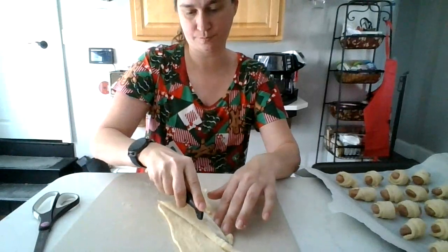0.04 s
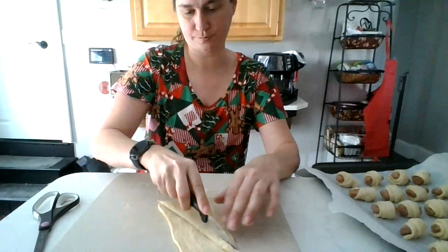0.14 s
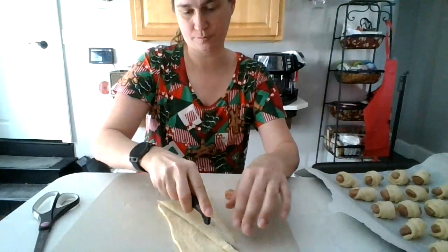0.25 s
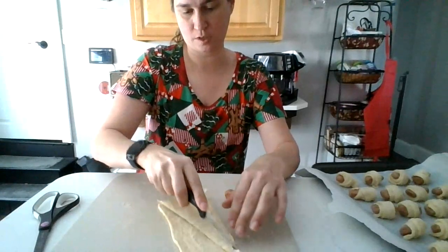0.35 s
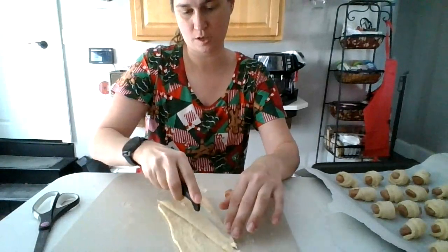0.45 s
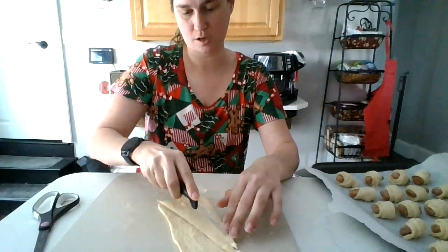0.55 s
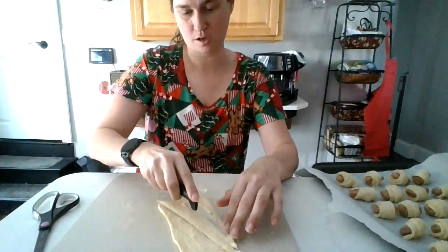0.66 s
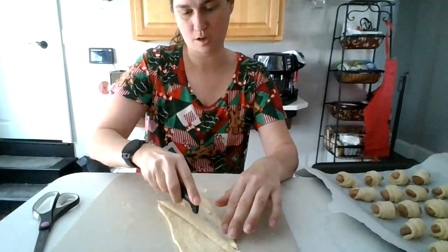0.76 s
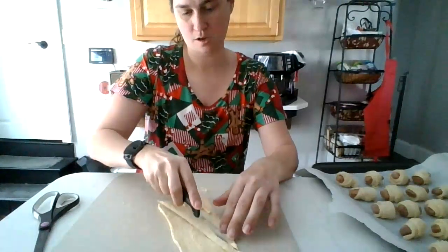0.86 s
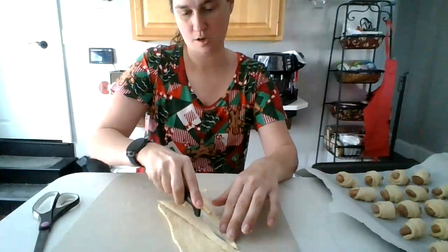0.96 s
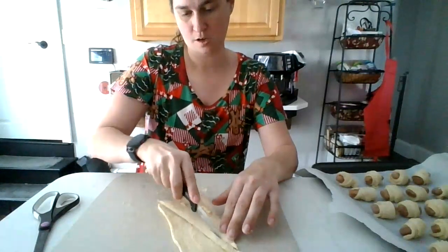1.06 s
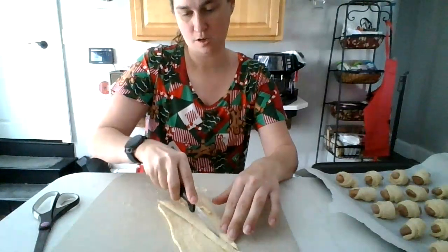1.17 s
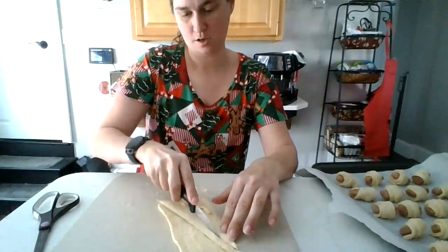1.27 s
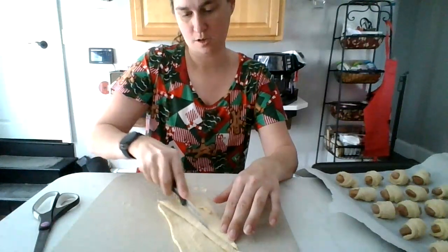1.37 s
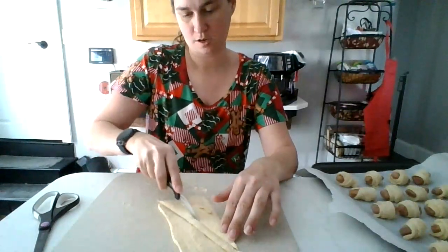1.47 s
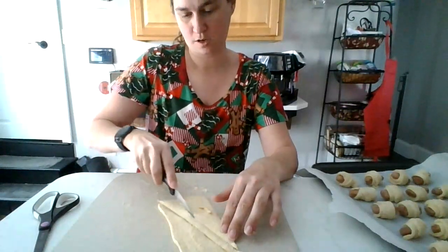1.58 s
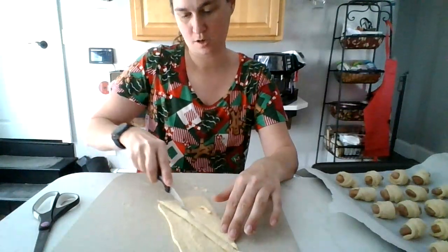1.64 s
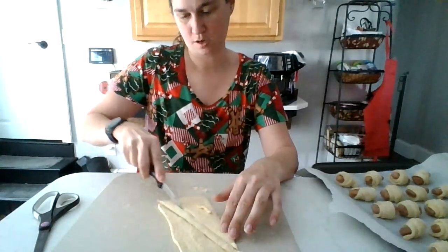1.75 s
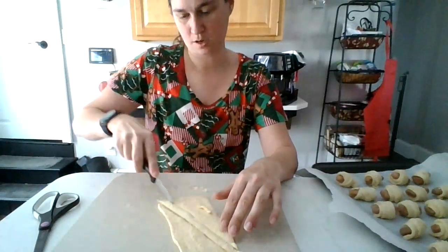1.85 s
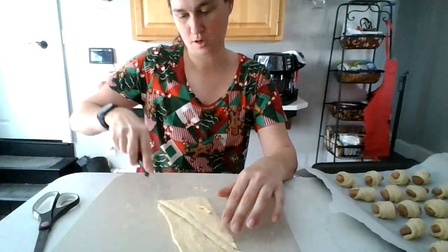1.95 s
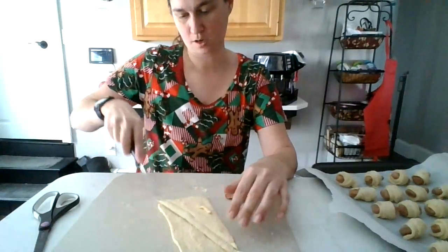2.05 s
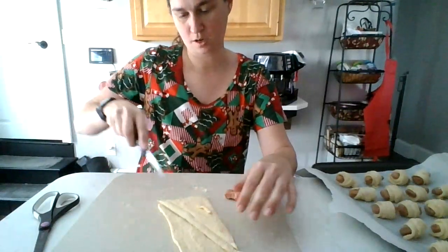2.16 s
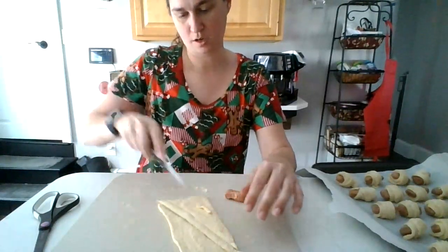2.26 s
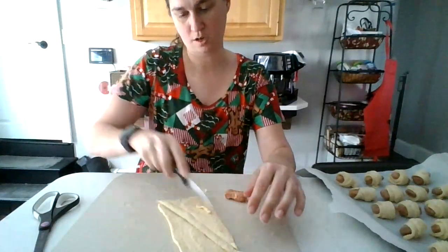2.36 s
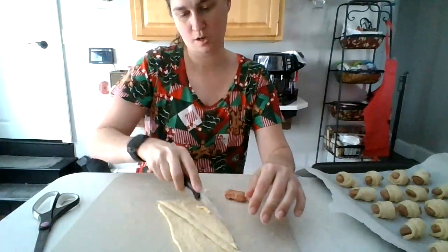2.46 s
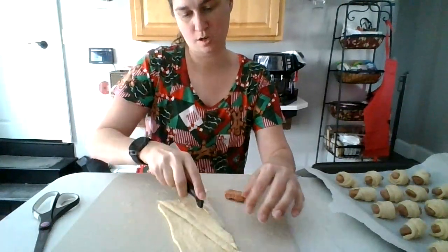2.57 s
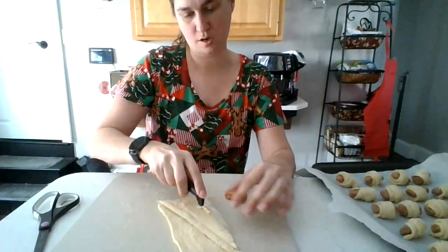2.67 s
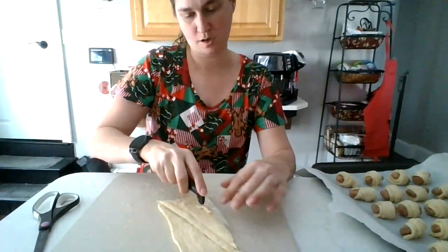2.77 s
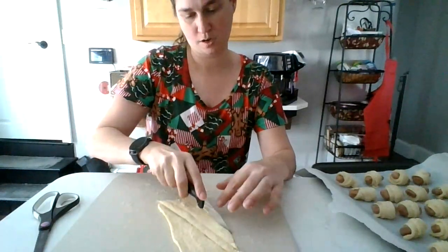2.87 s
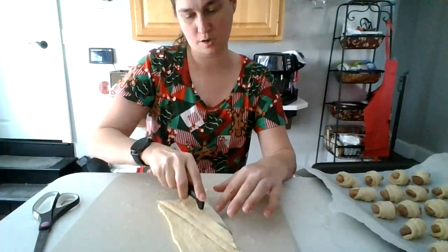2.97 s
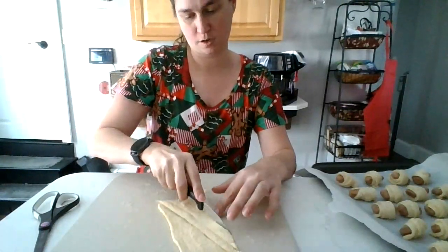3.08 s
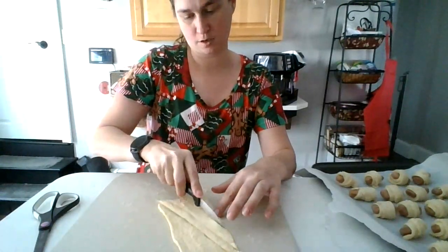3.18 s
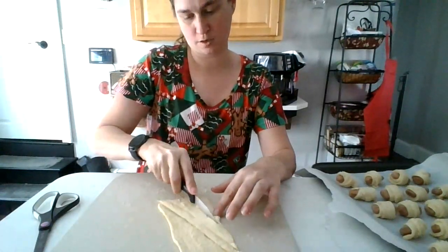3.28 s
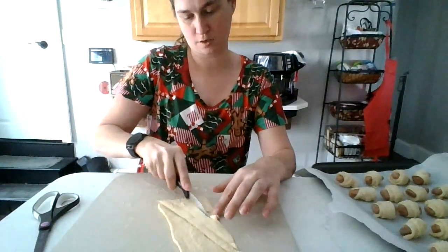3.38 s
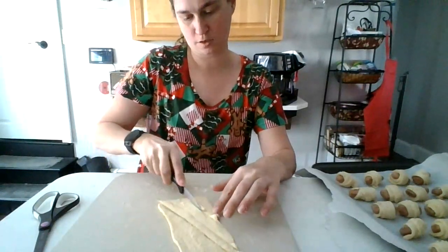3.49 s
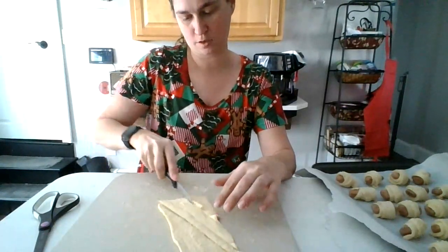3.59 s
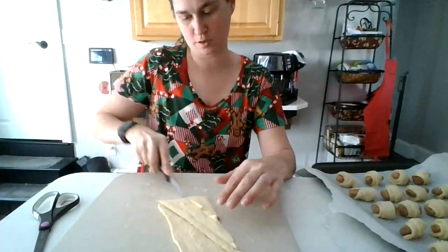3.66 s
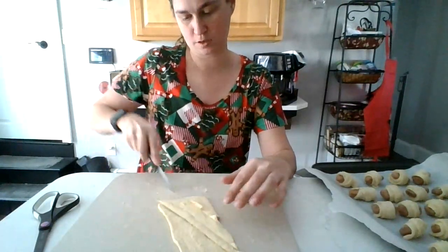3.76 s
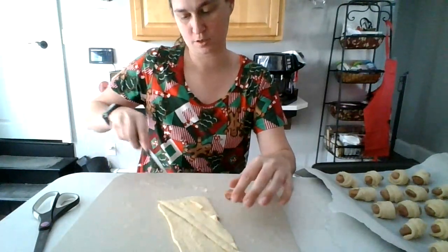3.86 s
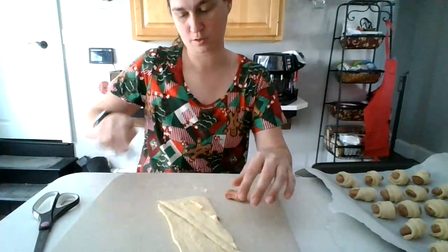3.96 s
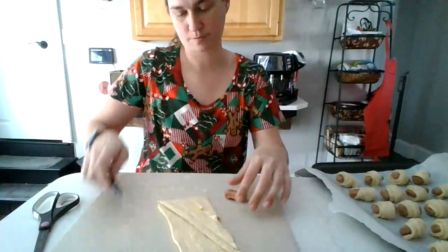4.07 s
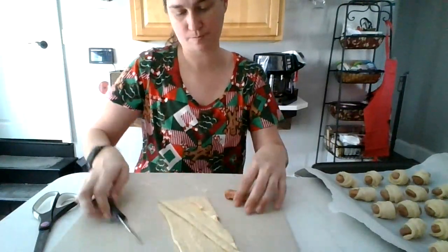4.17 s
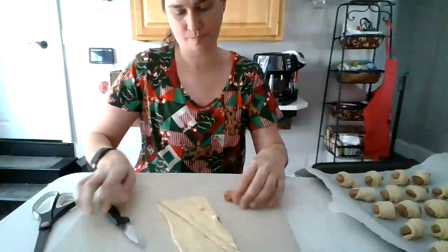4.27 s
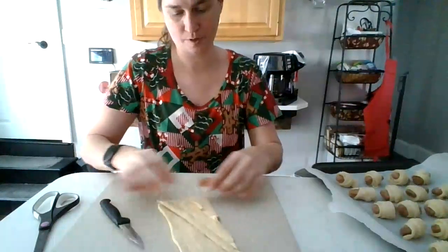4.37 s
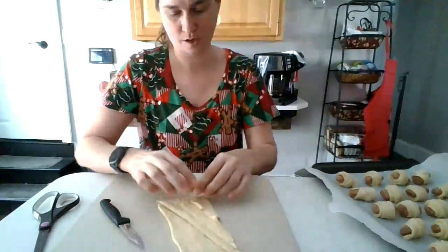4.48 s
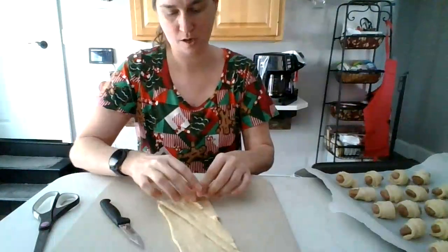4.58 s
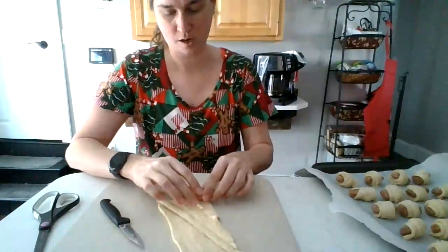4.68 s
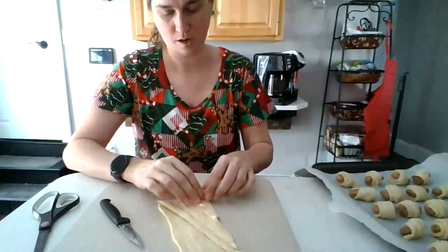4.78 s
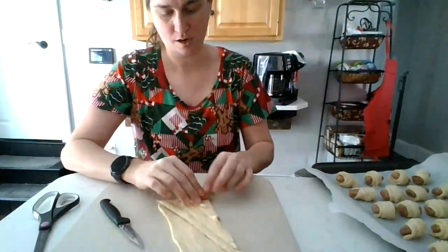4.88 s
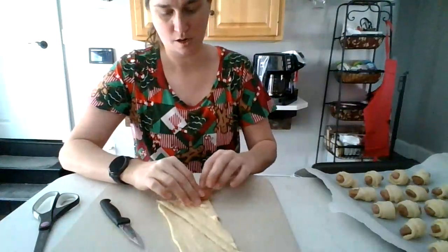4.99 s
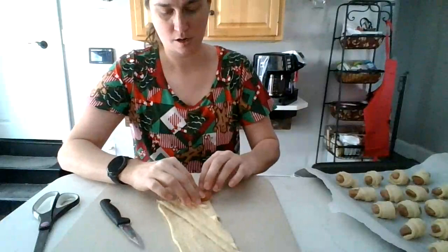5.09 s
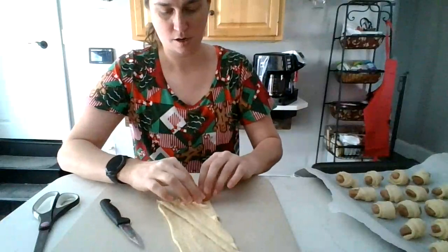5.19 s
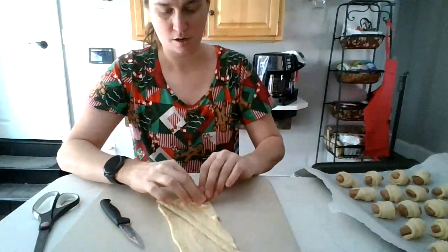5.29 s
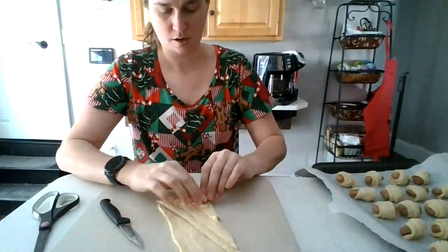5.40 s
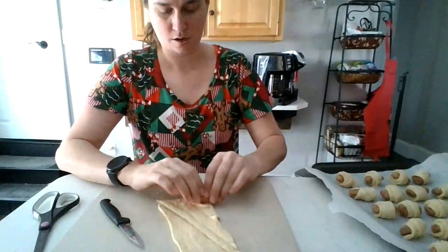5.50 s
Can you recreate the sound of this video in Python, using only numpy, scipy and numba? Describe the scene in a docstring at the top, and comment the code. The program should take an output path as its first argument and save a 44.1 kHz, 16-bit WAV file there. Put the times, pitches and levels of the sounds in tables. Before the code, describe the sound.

A faint, low motor hum and soft hiss run throughout in a small, hard-walled kitchen, heard in close stereo. For the first second, fingers lightly brush sticky dough, making tiny ticks. At 1.3 seconds a knife is drawn through the dough with a quiet, uneven hiss, ending near 2.1 seconds in a short rasp on the plastic board. A couple of ticks and a soft brush come around 2.8 seconds. A second cut starts at 3.1 seconds, swelling to another rasp at about 3.8. At 4.2 seconds the knife is dropped on the board: a quick, bright clatter with two sharp main hits, a brief metallic ring and a short room echo, by far the loudest event. From 4.5 seconds to the end, fingers roll up the dough with a very soft, grainy rub, a few sticky ticks and one light brush near 5.2 seconds.

```python
"""Dough is cut on a plastic board, close to two microphones in a small, hard kitchen where a motor hums.
First, fingers brush the sticky dough and it ticks. At 1.3 s and 3.1 s a knife is drawn through: friction
makes the edge hiss, and the tip rasps on the bare board as each cut ends. At 4.2 s the knife is dropped;
it clatters and rings, knocking the board, and the walls answer. From 4.5 s fingers softly roll up the
dough, with a few last ticks and a brush."""
import sys
import numpy as np
from scipy import signal
from scipy.fft import rfft, irfft, next_fast_len
from scipy.io import wavfile
from numba import njit

SR = 44100
rng = np.random.default_rng(int(sys.argv[2]) if len(sys.argv) > 2 else 0)


def generate_wav(signal):
    """Clip the signal to [-1, 1] and save it as 16-bit WAV at the path in sys.argv[1]."""
    frames = np.transpose(np.atleast_2d(signal))
    scaled = np.clip(frames, -1, 1) * 32767
    pcm = np.round(scaled).astype(np.int16)
    wavfile.write(sys.argv[1], SR, pcm)


N = 244086
TIME = np.arange(N) / SR

# the motor's partials: pitch_hz, rms_db
MOTOR_PARTIALS = [(29.6, -53.5), (59.6, -60), (89.5, -65.5), (119.8, -69), (150, -73), (180, -75),
                  (211, -71), (252, -74.5), (309, -79), (363, -76), (425.3, -75.5), (592.2, -80)]
# bed of air and microphone hiss: frequency_hz, level_db
AIR_COLOUR = [(12, 2), (22, -6.5), (42, -27), (120, -21.5), (240, -25.5), (450, -31.5), (900, -38),
              (1750, -38), (2600, -33), (3600, -41), (5800, -44.5), (7700, -43.5), (9500, -45),
              (15500, -47)]
# fingers and dough brushing the board: start_s, level_db, rise_s, fall_s, thud_mix_db
BRUSHES = [(.105, -63, 0.013, 0.1, -20), (.79, -60, 0.01, 0.045, 1.5), (1.09, -60.5, 0.053, 0.031, -27),
           (2.872, -49, 0.029, 0.049, -3.5), (3.93, -63, .025, 0.081, -16.5),
           (5.19, -60.5, 0.014, 0.039, 1)]
# a brush's hissy top: frequency_hz, level_db
BRUSH_COLOUR = [(300, -33.5), (1500, -5.5), (3500, -2), (5000, -3), (7700, 0.5), (10000, -4.5), (15500, -9)]
# a brush's dull body: frequency_hz, level_db
THUD_COLOUR = [(100, -14), (300, 7.5), (600, 5), (1200, 1), (2500, -4), (6000, -37)]
# ticks and squeaks of blade and sticky dough: start_s, level_db, peak_hz, spread_octaves
TICKS = [(0.2207, -46, 950, 0.8), (.306, -48, 6500, 0.83), (.45, -48.5, 5660, 0.27),
         (.683, -54.5, 7500, .9), (1.462, -50, 5300, .05), (2.77, -55, 7600, .35),
         (2.803, -57.5, 7040, .45), (4.5265, -53, 5980, 1.4), (4.5456, -51, 3030, 1.3),
         (4.676, -53, 5500, 0.62), (5.0008, -53, 10000, 0.77), (5.095, -52.5, 8540, 0.66)]
# the ring of knife and board: pitch_hz, level_db, t60_s
RING_MODES = [(1180, 4, 0.037), (2270, -8.5, 0.071), (3620, -6, 0.21), (4190, 1, 0.071), (4630, 0.5, 0.13),
              (6080, 5.5, 0.017), (7100, -6, 0.058), (6970, -14.5, 0.36), (7670, -1, 0.091),
              (8700, -7, .15), (9600, 0.5, 0.093), (11410, -14, 0.09), (13200, -6, .05)]
# knife strokes: start_s, fade_in_s, lift_s, slide_db, pull_db, pull_hold_s, rasp_db, rasp_swell_s,
# tip_pitch_ratio, edge_pitch_ratio
CUTS = [(1.343, 0.018, 2.1, -64.5, -49.5, 0.022, -45, 0.061, 0.928, .98),
        (3.125, 0.11, 3.836, -63, -50, 0.102, -52.5, 0.035, 1.117, 1.037)]
# accents where the hand presses harder: centre_s, boost_db, half_length_s
PUSHES = [(1.395, 7, 0.042), (1.492, 6.5, 0.07), (1.84, 3.5, 0.022), (3.448, 5, .06)]
# the blade singing in the dough: pitch_hz, width_hz, level_db
EDGE_MODES = [(3550, 620, -4), (5350, 320, -3), (5600, 510, -4.5), (6500, 400, -2), (7420, 710, -2),
              (8460, 710, -3), (9360, 870, -3.5), (11800, 4600, -4.5)]
# the blade bending under its tip: pitch_hz, width_hz, level_db
TIP_MODES = [(2380, 400, 0.5), (2720, 460, 0)]
# the board's body under the tip: pitch_hz, width_hz, level_db
BOARD_MODES = [(566, 300, -9), (738, 250, 3), (1180, 290, -4.5)]
# the dry grit of rubbing: frequency_hz, level_db
GRIT_COLOUR = [(500, -14), (1500, -8), (4200, 1.5), (7500, 1.5), (11000, -3.5), (14000, -11), (15500, -6)]
# the dropped knife's hits: start_s, level_db, peak_hz, spread_octaves, send_db, knock_mix_db, knock_hz
CLATTER = [(4.1914, -10.5, 3616, 1.7, -7, -8.5, 1200), (4.1926, -6.5, 7350, 1.05, -10, -23, 1200),
           (4.2013, -14, 7200, 1.6, -12.5, -20, 1200), (4.2396, -20.5, 2020, 0.61, -9.5, -22, 1200),
           (4.269, -18, 1750, .71, -12, -12, 749), (4.283, -2.5, 6780, 0.82, -9.5, -32.5, 260),
           (4.2846, -16.5, 2493, 1.7, -4.5, -16.5, 601), (4.3683, -29, 1790, 1.7, -9.5, -10, 750)]
# fingers rolling up the dough: frequency_hz, level_db
ROLL_COLOUR = [(300, 2), (900, -5), (1700, -1.5), (2020, 3), (2400, -11), (3200, -5), (5500, -8.5),
               (8000, -5.5), (15000, -16)]
# the kitchen's decay: frequency_hz, t60_s
ROOM_T60 = [(200, .6), (700, 0.525), (2000, 0.39), (5500, 0.4), (8000, 0.23), (12000, 0.27), (16000, 0.19)]
# how alike the microphones hear diffuse sound: frequency_hz, correlation_ratio
MIC_LIKENESS = [(100, 0.68), (700, 0.65), (1500, 0.7), (3000, 0.1), (5500, 0), (8000, 0.9), (14000, 0.98)]
# stereo image of the board: frequency_hz, left_over_right_db, left_lag_radians
MIC_IMAGE = [(99.5, 0, 0), (978, 0.5, 0.032), (3000, 0, 0.71), (5470, -6.5, 0.59), (7930, -9, 0.012),
             (13870, 9.5, 0)]


def amp(db):
    """Decibels to gain."""
    return np.exp(np.asarray(db) * (np.log(10) / 20))


def unit(x):
    """Scale to rms 1."""
    return x / np.sqrt(np.mean(x ** 2))


def at_hz(points, hz):
    """Read a curve on a log-frequency axis."""
    f, value = np.transpose(points)
    return np.interp(np.log(np.maximum(hz, 1)), np.log(f), value)


def bins(x):
    """Frequencies of the padded spectrum of x."""
    return np.fft.rfftfreq(next_fast_len(x.shape[-1], True), 1 / SR)


def filtered(x, gain):
    """EQ with one gain per bin."""
    size = next_fast_len(x.shape[-1], True)
    return irfft(rfft(x, size) * gain, size)[..., :x.shape[-1]]


def colour(x, curve):
    """EQ with a decibel curve, then scale to rms 1."""
    return unit(filtered(x, amp(at_hz(curve, bins(x)))))


def pair(two):
    """Narrow two unrelated signals to the width of two close microphones."""
    like = np.clip(at_hz(MIC_LIKENESS, bins(two)), 0, 1)
    mid, side = filtered(two, np.sqrt([(1 + like) / 2, (1 - like) / 2]))
    return np.array([mid + side, mid - side])


def walk(rate_hz):
    """Smooth random modulation at rms 1."""
    step = max(int(SR / rate_hz), 2)
    levels = rng.standard_normal(N // step + 2)
    ease = np.sin(np.pi / 2 * np.arange(step) / step) ** 2
    return unit((levels[:-1, None] + np.diff(levels)[:, None] * ease).ravel()[:N])


def fade(start_s, rise_s):
    """Linear fade-in."""
    return np.clip((TIME - start_s) / rise_s, 0, 1)


def add(out, start_s, sound):
    """Lay a sound into the track."""
    i = int(start_s * SR)
    out[:, i:i + sound.shape[1]] += sound[:, :N - i]


def motor_hum(waver_db=1.45, wobble_radians=0.51, beat_depth=.55, beat_s=2.55, lull_s=.6, pan_db=-1.5):
    """A motor hums near multiples of its shaft rate; the partial next to the mains beats against it."""
    beat = np.abs(1 - beat_depth * np.exp(2j * np.pi * (TIME - lull_s) / beat_s))
    hum = 0
    for hz, db in MOTOR_PARTIALS:
        beating = beat if 55 < hz < 65 else 1
        phase = 2 * np.pi * (hz * TIME + rng.random()) + wobble_radians * walk(7)
        hum = hum + beating * amp(db + waver_db * walk(9.8)) * np.sqrt(2) * np.sin(phase)
    return hum * amp([[pan_db / 2], [-pan_db / 2]])


def air(level_db=-48.5):
    """A steady bed of room air and microphone hiss."""
    return amp(level_db) * colour(pair(rng.standard_normal((2, N))), AIR_COLOUR)


def slips(per_s, scatter_db):
    """Friction: a dense rain of tiny slips of uneven size."""
    count = int(per_s * N / SR)
    scatter = amp(scatter_db * np.minimum(rng.exponential(size=(2, count)), 5))
    sizes = scatter * rng.standard_normal((2, count))
    return pair(np.array([np.bincount(rng.integers(0, N, count), row, N) for row in sizes]))


def brushes():
    """Fingers and soft dough rub the board: a hiss over a dull thud."""
    hiss = colour(slips(12000, 1.6), BRUSH_COLOUR)
    thud = colour(slips(4000, 1.6), THUD_COLOUR)
    out = 0
    for start_s, db, rise_s, fall_s, thud_db in BRUSHES:
        press = fade(start_s, rise_s) * np.exp(-np.maximum(TIME - start_s - rise_s, 0) / fall_s)
        out = out + amp(db) * press * (hiss + amp(thud_db) * thud)
    return out


def kitchen_reverb(send, predelay_s=0.0027, size=32768):
    """Hard walls return a diffuse tail, fed from the left channel; the treble dies first."""
    t, noise = TIME[:size], pair(rng.standard_normal((2, size)))
    centres = np.geomspace(200, 16000, 10)
    tail = 0
    for hz, weights in zip(centres, np.eye(len(centres))):
        band = filtered(noise, at_hz(np.c_[centres, weights], bins(noise)))
        tail = tail + band * np.exp(-np.log(1000) * t / at_hz(ROOM_T60, hz))
    tail = unit(tail * np.clip(t / predelay_s - 1, 0, 1)) / np.sqrt(size)
    return signal.fftconvolve(send[:1], tail, axes=1)[:, :N]


def hit(peak_hz, octaves, crack_t60, ring_db, top_hz=11000, size=8192):
    """One contact: a noisy crack plus the ring of knife and board; softer contacts sound lower."""
    t = TIME[:size]
    crack = unit(pair(rng.standard_normal((2, size))) * np.exp(-np.log(1000) * t / crack_t60))
    phases = rng.uniform(0, 2 * np.pi, (len(RING_MODES), 2, 1))
    ring = sum(amp(db) * np.exp(-np.log(1000) * t / t60) * np.sin(2 * np.pi * hz * t + phase)
               for (hz, db, t60), phase in zip(RING_MODES, phases))
    hump = -2 * np.log1p((np.log2((bins(t) + 1) / peak_hz) / octaves) ** 2 / 2)
    top_loss = np.log1p((bins(t) / top_hz) ** 7) / 2  # the plastic yields
    # minimum-phase EQ: nothing sounds ahead of the attack
    cepstrum = irfft(hump - top_loss, size) * (1 + np.sign(size / 2 - np.arange(size)))
    cepstrum[0] /= 2
    sound = filtered(crack + amp(ring_db) * unit(pair(ring)), np.exp(rfft(cepstrum)))
    return unit(sound) * np.sqrt(SR / 1000 / size)  # the energy of one millisecond at level 1


def sticky_ticks():
    """Dough comes unstuck in tiny ticks and squeaks; the lower ones last longer."""
    out = np.zeros((2, N))
    for start_s, db, hz, octaves in TICKS:
        add(out, start_s, amp(db) * hit(hz, octaves, crack_t60=0.0033 + 9 / hz, ring_db=-7.5))
    return out


def swell(end_s, grow_s, hold_s, release_s):
    """Envelope that grows exponentially, holds at 1 until end_s, then dies away."""
    to_peak, past_end = np.maximum(end_s - hold_s - TIME, 0), np.maximum(TIME - end_s, 0)
    return np.exp(-to_peak / grow_s - past_end / release_s)


def strokes(release_s=0.0071, drag_db=-64.5, drag_db_per_s=20, run_out_s=.11):
    """Envelopes and pitch bends of the cuts: the hand speeds up, the tip bears down, the blade lifts."""
    edge, tip, edge_ratio, tip_ratio, board_ratio = 0, 0, 1, 1, 1
    for start, entry, lift, slide_db, pull_db, hold, rasp_db, rasp_swell, tip_pitch, edge_pitch in CUTS:
        remaining_s = np.maximum(lift - TIME, 0)
        touch = fade(start, entry) * np.exp(-np.maximum(TIME - lift, 0) / release_s)
        pull = amp(pull_db) * swell(lift, grow_s=0.077, hold_s=hold, release_s=np.inf)
        edge = edge + touch * (amp(slide_db) + pull)
        drag = touch * amp(drag_db - drag_db_per_s * remaining_s)
        tip = tip + drag + amp(rasp_db) * swell(lift, rasp_swell, hold_s=0.044, release_s=.018)
        # as the contact runs out to the tip, the tip's pitch sinks and the board's climbs
        begun, to_go = TIME > start, np.minimum(remaining_s / run_out_s, 1)
        edge_ratio = np.where(begun, edge_pitch, edge_ratio)
        tip_ratio = np.where(begun, tip_pitch * (1 + 0.15 * to_go), tip_ratio)
        board_ratio = np.where(begun, 1.06 * (1 - 0.21 * to_go), board_ratio)
    push_db = sum(db * np.exp(-((TIME - centre) / half) ** 2) for centre, db, half in PUSHES)
    return edge * amp(push_db), tip, edge_ratio, tip_ratio, board_ratio


@njit
def bandpass(x, hz, width):
    """Sweepable state-variable band-pass."""
    y = np.empty_like(x)
    band, low = np.zeros(2), np.zeros(2)
    for i in range(x.shape[1]):
        g, k = np.tan(np.pi * hz[i] / SR), width / hz[i]
        for c in range(2):
            v = (band[c] + g * (x[c, i] - low[c])) / (1 + g * (g + k))
            band[c], low[c], y[c, i] = 2 * v - band[c], low[c] + 2 * g * v, k * v
    return y


def resonate(x, modes, ratio, drift, swell_db):
    """Steep resonances; each drifts and swells on its own as the contact travels."""
    out = 0
    for hz, width, db in modes:
        centre = np.minimum(hz * ratio * (1 + drift * walk(12)), .45 * SR)
        band = bandpass(bandpass(x, centre, float(width)), centre, float(width))
        out = out + unit(band) * amp(db + swell_db * walk(21.98))
    return unit(out)


def cutting(edge_db=-1.36, hiss_db=-6, tip_db=-0.6, board_db=-10, grit_db=-10, judder_db=1.36):
    """The edge rubs through the dough and rings the blade; the tip drags on the board and rings both."""
    edge_gain, tip_gain, edge_ratio, tip_ratio, board_ratio = strokes()
    friction = slips(9000, 1.7)
    edge = resonate(friction, EDGE_MODES, edge_ratio, drift=.025, swell_db=2.2)
    tip = resonate(friction, TIP_MODES, tip_ratio, drift=0.013, swell_db=1.0)
    board = resonate(friction, BOARD_MODES, board_ratio, drift=0.035, swell_db=1.5)
    grit = colour(slips(6000, 1.5), GRIT_COLOUR)
    slide = amp(edge_db) * edge + amp(hiss_db) * grit
    rasp = amp(tip_db) * tip + amp(board_db) * board + amp(grit_db) * grit
    return (edge_gain * slide + tip_gain * rasp) * amp(judder_db * walk(60))


def dropped_knife(knock_send_db=-5.5):
    """Blade and handle land in turn, knock the board and bounce; gives direct sound and reverb send."""
    direct, send = np.zeros((2, 2, N))
    for start_s, db, hz, octaves, send_db, knock_db, knock_hz in CLATTER:
        add(direct, start_s, amp(db) * hit(hz, octaves, crack_t60=0.0097, ring_db=-17))
        # the walls hear the hit from all sides, which evens out its spectrum like a shorter crack
        add(send, start_s, amp(db + send_db) * hit(hz, octaves, crack_t60=0.00041, ring_db=-21.5))
        knock = amp(db + knock_db) * hit(knock_hz, octaves=0.49, crack_t60=0.013, ring_db=-11.5)
        add(direct, start_s, knock)
        add(send, start_s, amp(knock_send_db) * knock)
    return direct, send


def rolling(start_s=4.46, rise_s=0.17, level_db=-63.5, sag_db_per_s=2, flutter_db=1.43):
    """Fingers roll up the dough: a grainy rub, ever lighter."""
    pressure = amp(level_db - sag_db_per_s * (TIME - start_s) + flutter_db * walk(22))
    return colour(slips(2700, 2.3), ROLL_COLOUR) * fade(start_s, rise_s) * pressure


def microphones(x):
    """Stereo image: the right side is a little earlier and brighter; the very top leans left."""
    balance_db, lag = (at_hz(np.array(MIC_IMAGE)[:, [0, k]], bins(x)) for k in (1, 2))
    return filtered(x, np.array([amp(balance_db / 2) * np.exp(-1j * lag), amp(-balance_db / 2)]))


def scene(work_send_db=-10.5):
    """The mix: close board work, clatter and their reverb over hum and air."""
    work = cutting() + brushes() + rolling() + sticky_ticks()
    clatter, clatter_send = dropped_knife()
    reverb = kitchen_reverb(clatter_send + amp(work_send_db) * work)
    return microphones(work + clatter + reverb) + motor_hum() + air()


def record(dry):
    """Peaks over full scale clip the input; a steep high cut follows."""
    high_cut = signal.ellip(10, .2, 80, 15800, fs=SR, output="sos")
    return signal.sosfilt(high_cut, np.clip(dry, -1, 1))


dry = scene()
out = record(dry)
generate_wav(out)
```